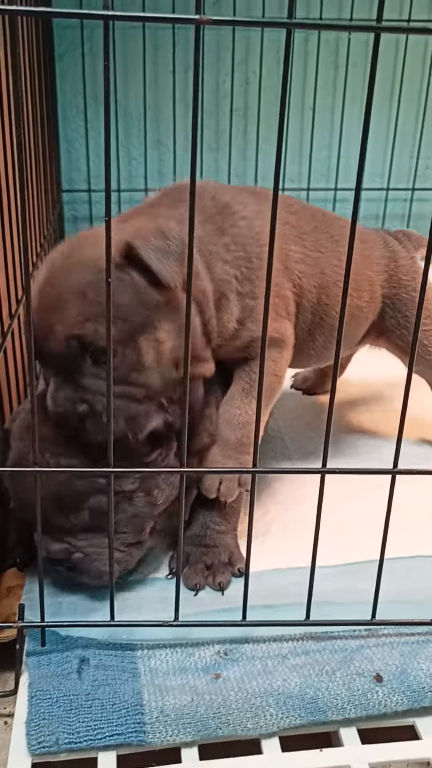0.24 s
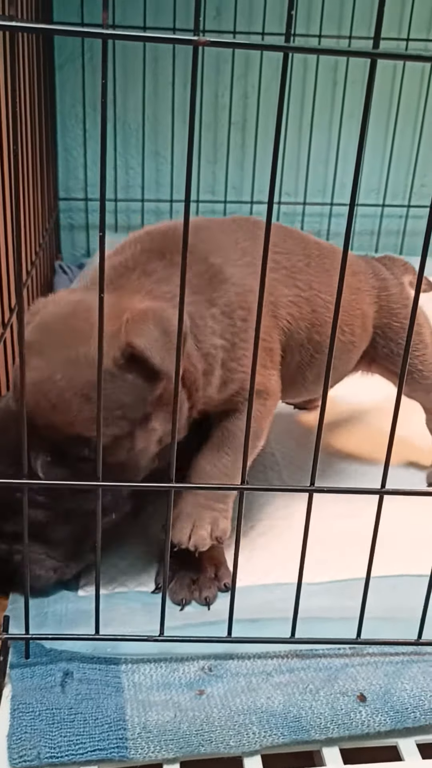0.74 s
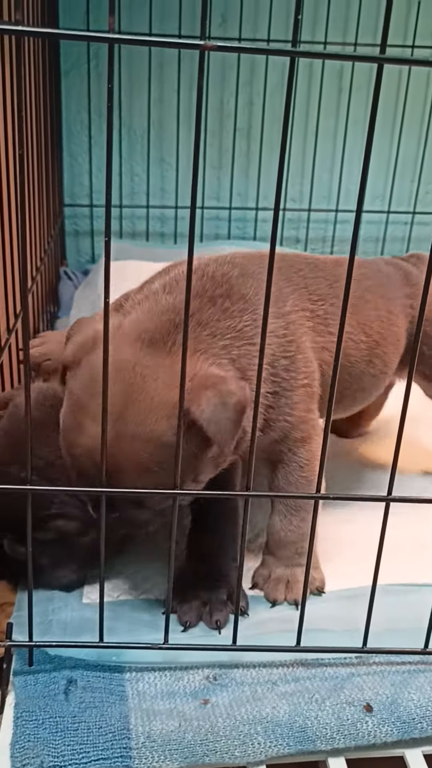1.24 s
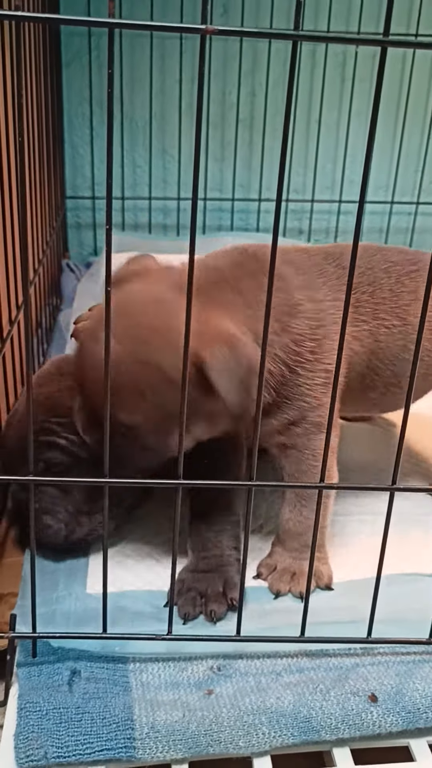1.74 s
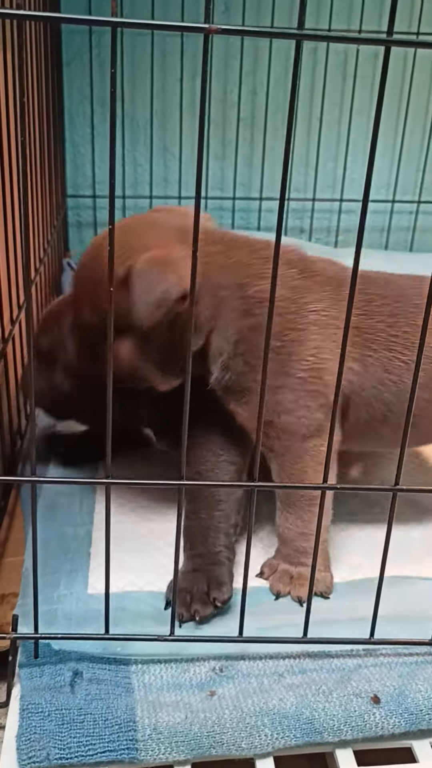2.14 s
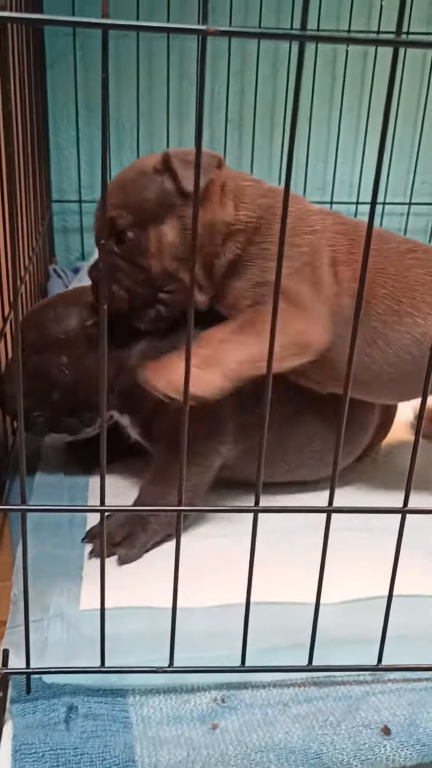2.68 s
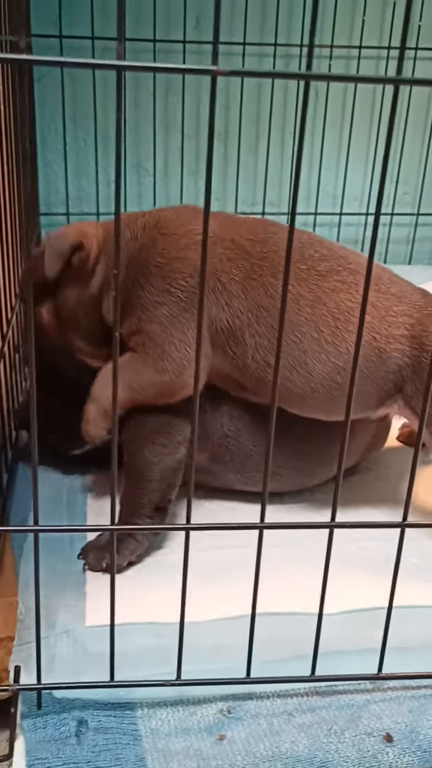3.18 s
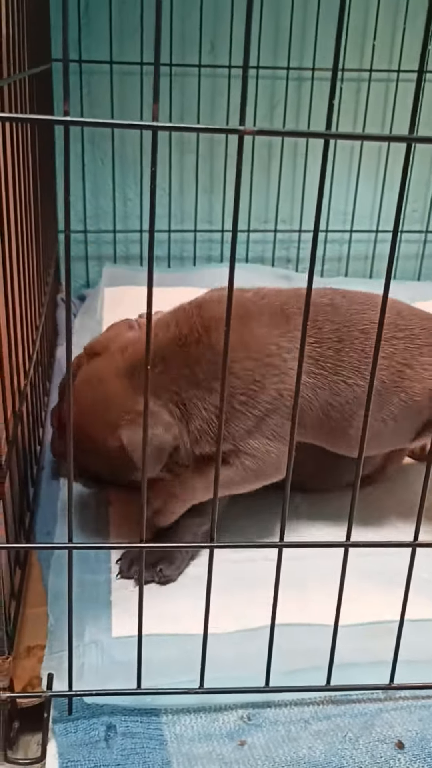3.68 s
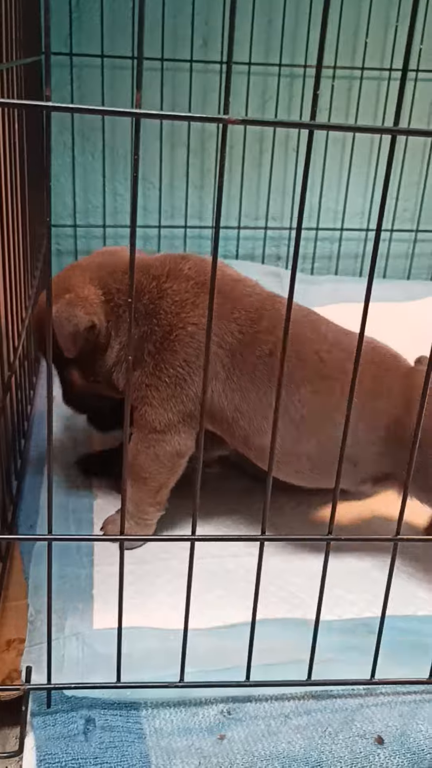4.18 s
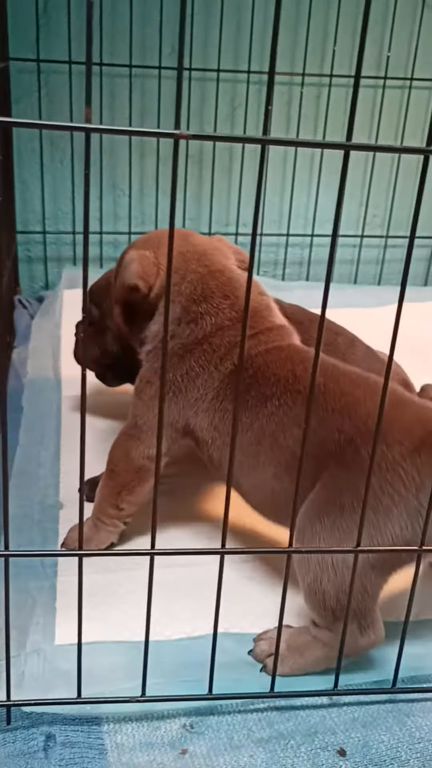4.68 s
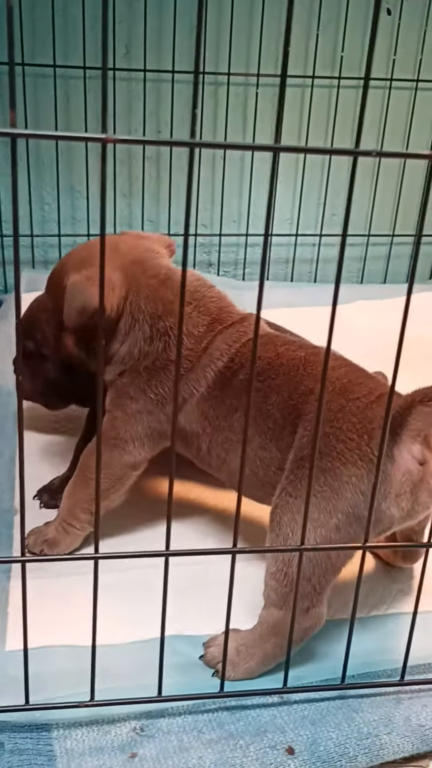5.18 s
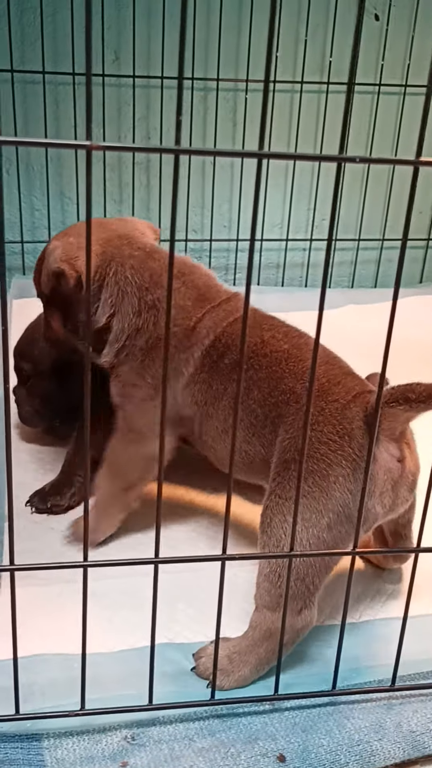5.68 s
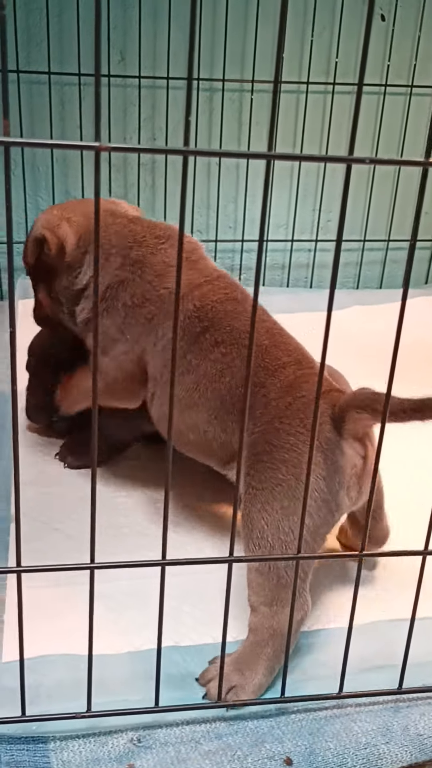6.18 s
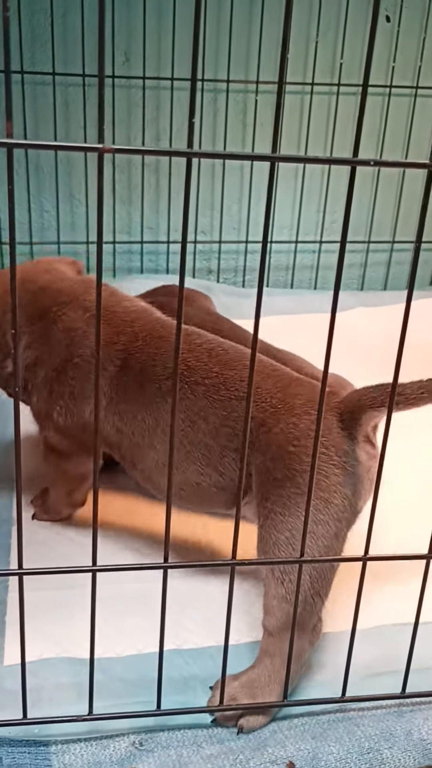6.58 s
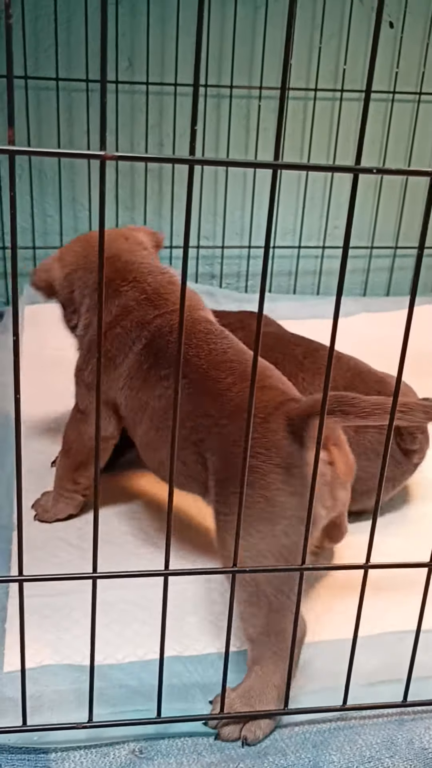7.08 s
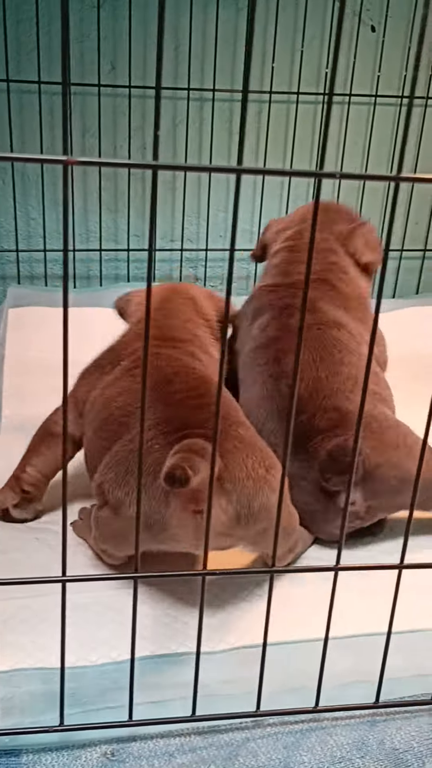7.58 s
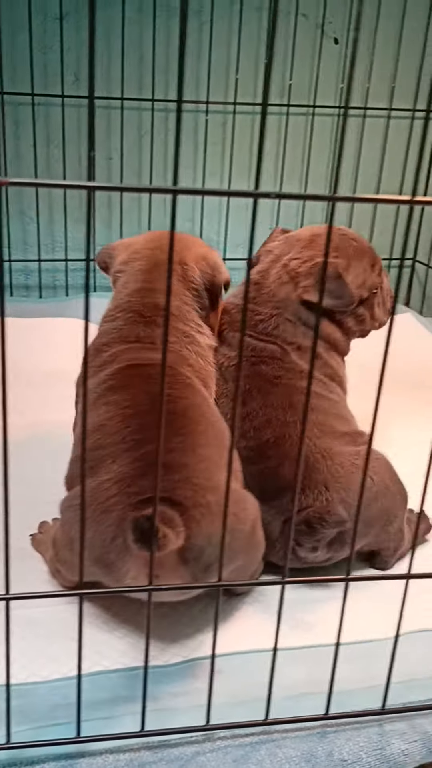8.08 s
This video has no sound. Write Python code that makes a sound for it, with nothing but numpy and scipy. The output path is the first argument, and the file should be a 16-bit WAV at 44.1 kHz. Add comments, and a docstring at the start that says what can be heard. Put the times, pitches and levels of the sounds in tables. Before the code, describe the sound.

Two puppies scuffle on a crinkly pad in a wire crate, with soft rustling, sharp claw ticks and a few light knocks. Faint high whimpers and small grunts come first. In the second half, one puppy lets out a run of louder, shrill yelps that turn raspy at their peaks, then trails off in a whine. A faint motor hum and hiss sit underneath in the small, hard room.

```python
"""A puppy whines and yelps as it scuffles with another on a crinkly pad in a wire crate.
Its vocal folds are a harmonic source filtered by the throat; at the top of a yelp their vibration
turns irregular and rasps. The other puppy grunts. Paws and fur rustle the pad, claws tick on pad
and wires, and paws knock the tray, over the hum of a small motor and a faint hiss of air.
Both voices reverberate in a small hard room."""
import sys
import numpy as np
from scipy import signal
from scipy.fft import rfft, irfft
from scipy.io import wavfile
from scipy.ndimage import uniform_filter1d

SR = 44100
rng = np.random.default_rng(int(sys.argv[2]) if len(sys.argv) > 2 else 0)


def bounce(signal):
    """Save signal as a 16-bit WAV file at the path given by the first command-line argument."""
    frames = np.transpose(np.atleast_2d(signal))
    limited = np.clip(frames, -1, 1)
    pcm = np.round(limited * 32767).astype(np.int16)
    wavfile.write(sys.argv[1], SR, pcm)


N = 367353

# All levels are relative. One contour a cry: t/s, f/Hz, fundamental level/dB, overtone level/dB
CRIES = [
    [(2.66, 1580, -84, -59), (2.69, 1288, -48, -58), (2.74, 1290, -93, -73)],
    [(3.68, 1397, -50.5, -62), (3.7, 1281, -54, -59), (3.86, 1293, -42.5, -53), (3.91, 1327, -42, -54),
     (3.94, 1380, -78, -73)],
    [(4.89, 1278, -56.5, -65.5), (4.93, 1170, -64.5, -60.5), (4.985, 1100, -57.5, -72.5),
     (5.03, 1200, -65, -55.5), (5.082, 1296, -45.5, -62), (5.108, 1397, -47, -32.5),
     (5.118, 1462, -36, -27.5), (5.135, 1500, -23, -23.5), (5.155, 1469, -25.5, -21.5),
     (5.16, 1637, -27, -43), (5.2, 1567, -36.5, -33)],
    [(5.62, 1550, -50, -71), (5.635, 1348, -82, -48), (5.715, 1342, -39, -33), (5.722, 1392, -50, -37),
     (5.75, 1410, -39, -36), (5.76, 1450, -21.5, -26.5), (5.79, 1531, -20, -22.5),
     (5.797, 1667, -28.5, -31.5), (5.855, 1623, -25.5, -37.5), (5.868, 1398, -47, -42),
     (6.045, 1332, -41.5, -47.5), (6.055, 1253, -46.5, -41), (6.1, 1277, -83, -62)],
    [(6.265, 1316, -51.5, -71), (6.3, 1197, -53, -58), (6.39, 1350, -41, -56.5), (6.44, 1570, -27, -73),
     (6.46, 1420, -38, -53.5), (6.535, 1445, -34.5, -49.5), (6.578, 1360, -35.5, -62)],
    [(6.762, 1258, -49.5, -58.5), (6.78, 1185, -52, -39), (6.81, 1347, -28.5, -26),
     (6.9, 1361, -31.5, -26.5), (6.93, 1480, -26, -34), (6.957, 1503, -28.5, -26.5),
     (6.965, 1700, -18, -33), (7.02, 1806, -15, -29.5), (7.065, 1832, -24.5, -30.5)],
    [(7.265, 1083, -48.5, -57), (7.305, 1232, -52, -42.5), (7.38, 1243, -51, -37),
     (7.435, 1320, -44.5, -40.5), (7.46, 1392, -46.5, -34.5), (7.53, 1338, -34, -43.5),
     (7.552, 1340, -46, -40)],
    [(7.558, 1260, -35, -58), (7.572, 1198, -60, -32.5), (7.6, 1035, -83, -50.5)],
]
# timbre of each cry: octave offset/dB, third-harmonic offset/dB, lift of the higher formants/dB
TIMBRES = [(-16, -22, 1), (-10, -14, 1.5), (1, -20.5, 0), (-12.5, -2.5, 6), (7, 2.5, 3), (-1, -4.5, 0.5),
           (-15.5, -18.5, 3.5), (-3.5, -34, 18)]
# voice breaks: start t/s, end t/s, jitter as a share of pitch
BREAKS = [(5.1, 5.16, .006), (5.16, 5.21, .03), (5.715, 5.755, .01), (5.795, 5.88, .027),
          (6.045, 6.08, .02), (6.41, 6.455, .04), (6.56, 6.58, .015), (6.93, 6.96, .012),
          (6.96, 7.09, .055), (7.56, 7.61, .006)]
# throat resonances: f/Hz, bandwidth/Hz, level/dB
FORMANTS = [(5200, 1100, 0), (7600, 1200, -3), (13500, 2500, -20)]
# spectrum of air rushing past the folds: f/Hz, level/dB
RASP_SPECTRUM = [(400, -19), (1000, -21), (1750, 8), (3100, -20), (4150, 3), (5600, -10), (7300, -3),
                 (10300, -26), (14000, -36)]
# grunts: t/s, duration/s, start f/Hz, end f/Hz, level/dB
GRUNTS = [(0.254, 0.072, 720, 380, -72.5), (3.137, 0.057, 950, 947, -53.5), (4.233, 0.066, 837, 795, -47.5),
          (4.385, 0.033, 907, 970, -49)]
# claws striking pad and wires: t/s, level/dB
TICKS = [(0.7188, -23), (1.5, -48), (2.253, -25.5), (2.398, -19), (2.43, -30), (2.46, -19), (2.465, -34),
         (3.836, -42), (4.006, -22), (4.016, -29), (4.021, -18), (4.514, -25), (7.8269, -25.5)]
# paws striking the tray: t/s, level/dB, f/Hz
KNOCKS = [(0.685, -39, 229), (2.77, -36, 102), (3.144, -44.5, 566), (3.296, -39.5, 530),
          (7.012, -31.5, 119.9), (7.563, -31, 135), (7.698, -38.5, 398)]
# paws and bodies scuffing the pad: peak t/s, reach/s, level/dB, coarseness/dB
SCUFFS = [(0.461, 0.068, -53.5, -2.5), (0.972, 0.074, -50, -1), (1.16, 0.035, -59, 4),
          (1.587, 0.053, -44, -1.5), (1.94, 0.056, -49, -6.5), (2.16, 0.19, -57, 4.5),
          (2.45, 0.037, -44.5, 7.5), (2.771, 0.042, -53.5, 5.5), (3.94, 0.049, -52, 5.5),
          (4.027, 0.03, -49, 7.5), (4.16, 0.035, -48, 9), (4.29, 0.14, -53.5, 1), (4.49, 0.037, -46.5, 4.5),
          (5.14, 0.051, -43, 0), (5.779, 0.088, -61, -1.5), (6.03, 0.1, -59.5, 2.5), (6.218, 0.03, -47, 5),
          (6.42, .1, -54.5, 7.5), (7.351, 0.12, -50, 11.5), (7.578, 0.037, -47.5, 9.5),
          (7.95, 0.14, -60, 8.5), (4.7, 0.046, -76.5, 39)]
# faint background rustle, ducked at times as by automatic gain control: t/s, level/dB
RUSTLE_FLOOR = [(0, -72), (.8, -82), (1.4, -58.5), (2.6, -66.5), (3.1, -70), (3.8, -64), (4.8, -71.5),
                (5.55, -73.5), (6.1, -86), (6.7, -59.5), (7.8, -66.5), (8.33, -62.5)]
# spectra of the crinkling pad and of dragging bodies: f/Hz, level/dB
CRINKLE_SPECTRUM = [(700, -30), (1500, -19), (2400, -20), (3300, -13), (6400, -11), (7440, -5),
                    (10000, -13), (13800, 0), (15600, -3)]
DRAG_SPECTRUM = [(60, -11), (400, -4.5), (1000, -13), (2000, -27.5)]
# motor hum as heard, its level rising and falling as under noise suppression: t/s, shaft f/Hz, level/dB
MOTOR_HUM = [(0, 52.05, -65), (.6, 53.12, -46), (3.3, 53.44, -50), (4.6, 53.06, -44.5), (4.95, 51.38, -55),
             (8.33, 48.4, -47.5)]
# motor partials: multiple of the shaft frequency, level/dB
SHAFT_ORDERS = [(0.998, 0.7), (1.501, -4), (2, 1.6), (3, 0), (3.701, -2.5)]
# spectra of the motor's rumble and of the room's air: f/Hz, level/dB
RUMBLE_SPECTRUM = [(40, -26.5), (70, 2.0), (220, 7.0), (500, -13.5), (1200, -14.5)]
AIR_SPECTRUM = [(40, -23.5), (111, 5.5), (2520, -28.5), (10700, -29), (15600, -26.5)]
# reverberation time of the room: f/Hz, T60/s
ROOM_T60 = [(300, .2), (1500, .36), (3000, .28), (15000, .18)]

OCTAVE_GROWTH, EASY_DB = .1, -32  # above an easy effort the octave outgrows the other overtones
STEADY_JITTER, DRIFT = .0015, .002  # shares of pitch while the voice holds
OCTAVE_LOSS_DB, UPPER_LOSS_DB = 152.5, 197  # per unit of jitter: a breaking voice loses overtones
SWELL_SHARE, REACH_DB = .78, -6  # a scuff swells faster than it fades; its level at its reach
THROB_HZ, COARSE_HZ, BAND_LIMIT_HZ = 85.24, 6540, 15650


def cries(t):
    """Source and filter: the throat shapes the folds' harmonics; breaks add jitter, shimmer and rasp."""
    rows = [row + timbre for cry, timbre in zip(CRIES, TIMBRES) for row in cry]
    hz, fundamental_db, upper_db, octave_offset, third_offset, lift_db = curves(rows, t)
    octave_db = upper_db + octave_offset + OCTAVE_GROWTH * (upper_db - EASY_DB) + 1.1 * wander(1200)
    third_db = upper_db + third_offset + 2.2 * wander(900)
    jitter = STEADY_JITTER + sum(share * gate([(a, b)], t, fade_s=.016) for a, b, share in BREAKS)
    phase = phase_of(hz * (1 + jitter * wander(45) + DRIFT * wander(400)))
    tone = (gain_of(fundamental_db) * np.sin(phase)
            + gain_of(octave_db - OCTAVE_LOSS_DB * jitter) * np.sin(2 * phase)
            + gain_of(third_db) * np.sin(3 * phase)
            + gain_of(upper_db - UPPER_LOSS_DB * jitter) * throat_harmonics(hz, phase, lift_db))
    flutter = wander(60)
    throb = np.sin(phase_of(THROB_HZ * (1 + wander(900) / 5)))
    shimmer = 1 + jitter * (flutter + 12 * throb)
    amplitude = sum(map(gain_of, (fundamental_db, octave_db, third_db, upper_db)))
    rasp = 6.47 * jitter * amplitude * coloured(rng.standard_normal(N), RASP_SPECTRUM)
    voiced = gate([(cry[0][0], cry[-1][0]) for cry in CRIES], t, fade_s=.002)
    return (np.sqrt(2) * tone + rasp) * shimmer * voiced


def throat_harmonics(hz, phase, lift_db):
    """Resonance: harmonics 4 to 12 are strongest where they lie near a formant."""
    tone, power = np.zeros(N), np.zeros(N)
    for k in range(4, 13):
        weight = sum(gain_of(db + lift_db * (f > FORMANTS[0][0])) / (1 + (2 * (k * hz - f) / width) ** 2)
                     for f, width, db in FORMANTS)
        weight *= gain_of(4.5 * wander(1500))  # each comes and goes as the tongue moves
        tone += weight * (k * hz < BAND_LIMIT_HZ) * np.sin(k * phase)
        power += weight ** 2
    return tone / np.sqrt(uniform_filter1d(power, 6000))


def grunts():
    """Modulation: random flutter of pitch and amplitude makes a gliding tone and its octave hoarse."""
    out = np.zeros(N)
    for start, duration, start_hz, end_hz, db in GRUNTS:
        n = int(duration * SR)
        phase = phase_of(np.linspace(start_hz, end_hz, n) * (1 + .02 * wander(60)[:n]))
        tone = np.sin(phase) + gain_of(-13) * np.sin(2 * phase)
        envelope = signal.windows.tukey(n, .4) * (1 + .7 * wander(120)[:n])
        out[round(start * SR):][:n] += gain_of(db) * envelope * tone
    return out


def paw_impacts():
    """Impact excitation: claws give short bright bursts; knocks set the tray in damped vibration."""
    n = 4000
    out, age = np.zeros(N + n), np.arange(n) / SR
    tick_decay = decay(age, t60=.005) + gain_of(-20) * decay(age, t60=.05)
    for start, db in TICKS:
        burst = np.diff(np.sign(rng.standard_normal(n)), prepend=0) / 2
        out[round(start * SR):][:n] += gain_of(db) * tick_decay * burst
    knock_envelope = (1 - np.exp(-age / .00033)) * decay(age, t60=.053)
    for start, db, hz in KNOCKS:
        out[round(start * SR):][:n] += gain_of(db) * knock_envelope * np.sin(2 * np.pi * hz * age)
    return out[:N]


def pad_rustle(t):
    """Crackle and friction: tiny snaps of the plastic-backed pad merge over the dull drag of bodies."""
    level_db, coarse_db = scuffing(t)
    snap_db = 4 * np.minimum(rng.exponential(1, N), 5)
    snaps = gain_of(snap_db) * (rng.random(N) < 600 / SR)  # about 600 a second
    crackle = rng.standard_normal(N) * (1 + .22 * unit_rms(uniform_filter1d(snaps, 30)))
    crackle *= gain_of(1.3 * wander(500))
    _, _, bands = signal.stft(coloured(crackle, CRINKLE_SPECTRUM), nperseg=256)
    creases = uniform_filter1d(rng.standard_normal(bands.shape), 8, axis=0)
    creases = unit_rms(uniform_filter1d(creases, 12, axis=1))  # they come and go, band by band
    crinkle = unit_rms(signal.istft(bands * gain_of(2.65 * creases), nperseg=256)[1][:N])
    lows = signal.sosfiltfilt(signal.butter(2, COARSE_HZ, fs=SR, output="sos"), crinkle)
    crinkle += (gain_of(coarse_db) - 1) * lows  # coarse scuffs are stronger below COARSE_HZ
    drag = coloured(rng.standard_normal(N) * gain_of(2 * wander(700)), DRAG_SPECTRUM)
    return gain_of(level_db + 10) * crinkle + gain_of(.59 * level_db + coarse_db - 29.5) * drag


def scuffing(t):
    """Summed envelopes: scuffs over a faint floor set the rustle's level/dB and coarseness/dB."""
    peak_t, reach, peak_db, coarse_db = np.transpose(SCUFFS)[:, :, None]
    grid = t[::64]
    distance = abs(grid - peak_t) / (reach * np.where(grid < peak_t, SWELL_SHARE, 1))
    gains = gain_of(peak_db + REACH_DB * distance ** 1.4)
    total = gains.sum(0) + gain_of(curves(RUSTLE_FLOOR, grid)[0])
    mean_coarse_db = (gains * coarse_db).sum(0) / total
    return np.interp(t, grid, 20 * np.log10(total)), np.interp(t, grid, mean_coarse_db)


def motor_hum(t):
    """Forced vibration: wavering partials follow the shaft's rotation, over a low rumble."""
    shaft_hz, level_db = curves(MOTOR_HUM, t)
    phase = phase_of(shaft_hz)
    partials = sum(gain_of(db + 2.2 * wander(3000)) * np.sin(order * phase + 6 * rng.random())
                   for order, db in SHAFT_ORDERS)
    rumble = coloured(rng.standard_normal(N), RUMBLE_SPECTRUM)
    return gain_of(level_db - 5.5) * (unit_rms(partials) + gain_of(-10.5) * rumble)


def reverberation(x):
    """Reflection and absorption: each band of echoes dies at its own rate; moving bodies vary the paths."""
    echoes = np.zeros(SR)
    slots = np.arange(300, SR - 20, 20)
    echoes[slots + rng.integers(0, 20, len(slots))] = rng.choice([-1., 1.], len(slots))
    hz, age, bands = signal.stft(echoes, SR, nperseg=256)
    tail = signal.istft(bands * decay(age, at_frequency(ROOM_T60, hz)[:, None]), SR, nperseg=256)[1]
    wavering = np.interp(np.arange(N) + .8 * wander(300), np.arange(N), x)
    return signal.fftconvolve(wavering, tail / np.linalg.norm(tail))[:N]


def gain_of(db):
    return 10 ** (np.asarray(db) / 20)


def decay(age, t60):
    return gain_of(-60 * age / t60)


def phase_of(hz):
    return 2 * np.pi * np.cumsum(hz) / SR


def unit_rms(x):
    return x / np.sqrt(np.mean(x ** 2) + 1e-20)


def at_frequency(points, hz):
    """Interpolation on a logarithmic frequency axis."""
    f, value = np.transpose(points)
    return np.interp(np.log(hz + 1), np.log(f + 1), value)


def curves(rows, t):
    """Linear interpolation of each column in time."""
    times, *columns = np.transpose(rows)
    return [np.interp(t, times, column) for column in columns]


def wander(width):
    """Low-pass noise of unit rms, changing over about width samples."""
    return unit_rms(uniform_filter1d(uniform_filter1d(rng.standard_normal(N), width), width))


def coloured(x, spectrum):
    """Spectral shaping, scaled to unit rms."""
    return unit_rms(irfft(rfft(x) * gain_of(at_frequency(spectrum, np.fft.rfftfreq(N, 1 / SR))), N))


def gate(spans, t, fade_s):
    """Gating: one within any span, zero between, with soft edges."""
    on = sum((t >= start) & (t <= end) for start, end in spans) > 0
    return uniform_filter1d(on * 1., int(fade_s * SR))


def scene():
    """Superposition: the voices and their reverberation add to paws, pad, motor and air."""
    t = np.arange(N) / SR
    voices = cries(t) + grunts()
    air = gain_of(-63.5) * coloured(rng.standard_normal(N), AIR_SPECTRUM)
    voices_in_room = gain_of(1) * voices + gain_of(-2.5) * reverberation(voices)
    return (voices_in_room + paw_impacts() + pad_rustle(t) + motor_hum(t) + air)[None]


def record(dry):
    """Band limiting: the microphone cuts the lowest bass, and a low-pass filter the highest treble."""
    bass_cut = signal.sosfilt(signal.butter(5, 45, "high", fs=SR, output="sos"), dry)
    low_pass = signal.firwin(801, BAND_LIMIT_HZ, window=("kaiser", 9), fs=SR)
    return signal.oaconvolve(bass_cut, low_pass[None], "same")


dry = scene()
out = record(dry)
bounce(out)
```